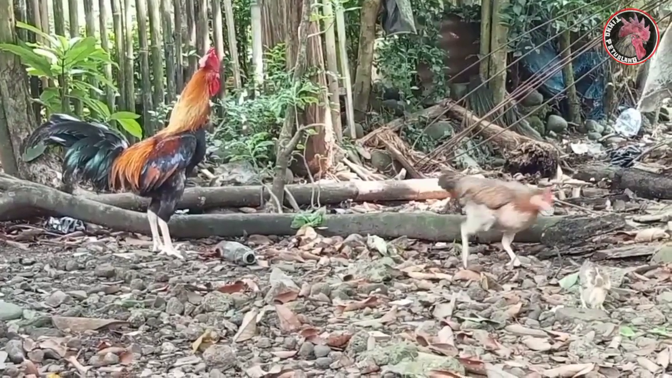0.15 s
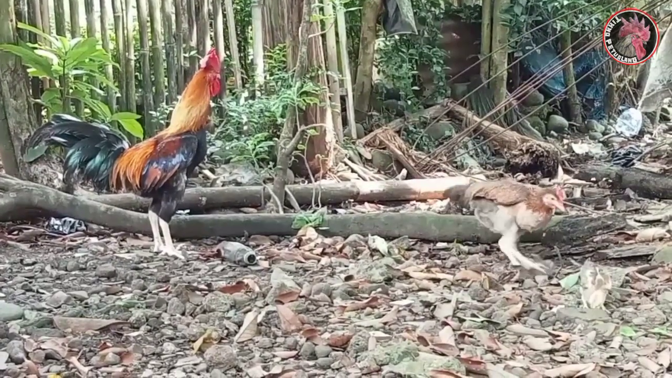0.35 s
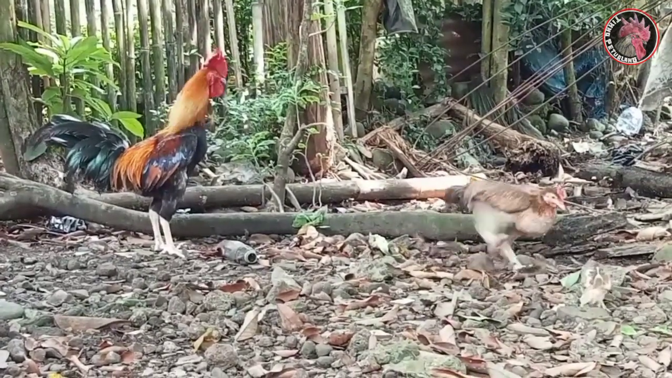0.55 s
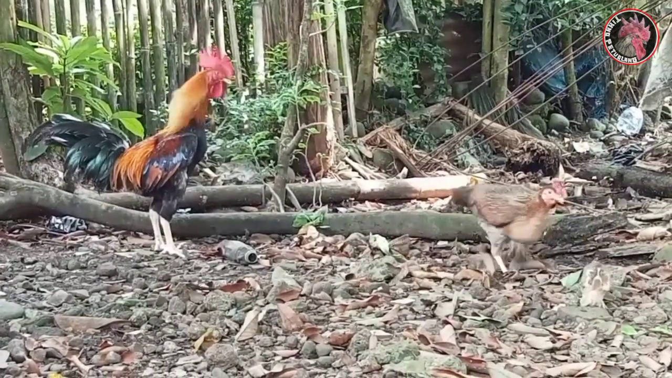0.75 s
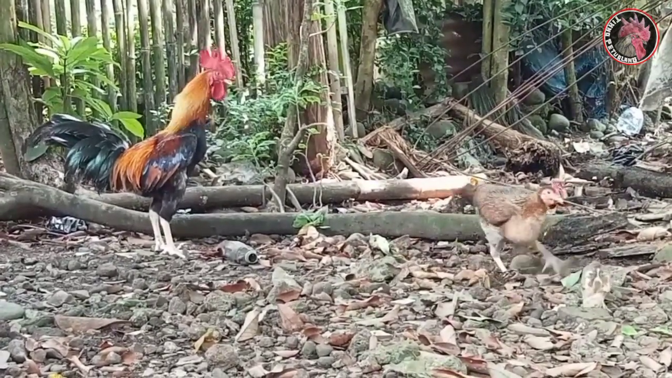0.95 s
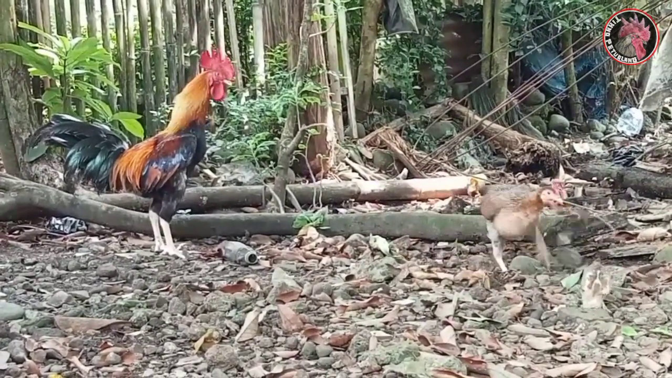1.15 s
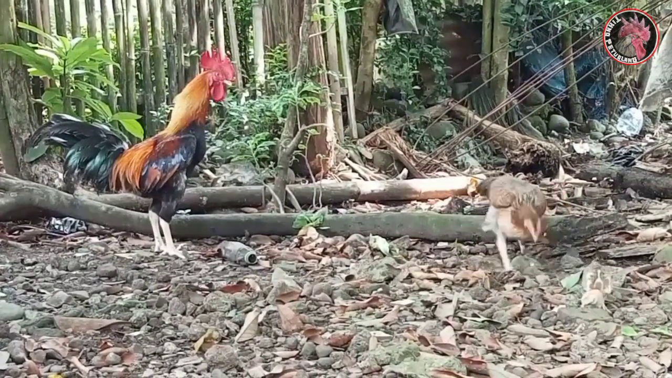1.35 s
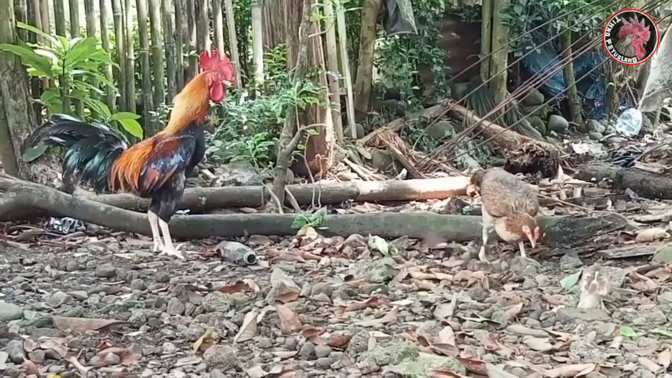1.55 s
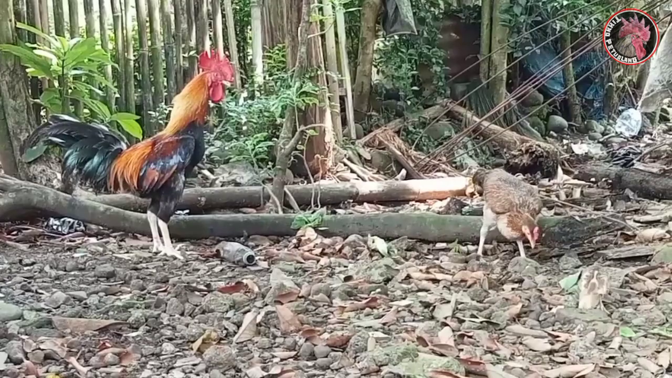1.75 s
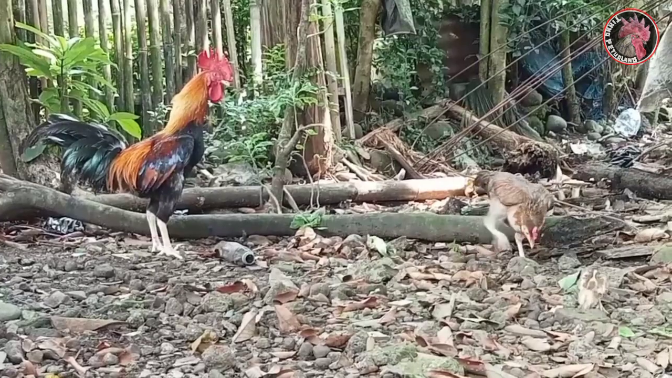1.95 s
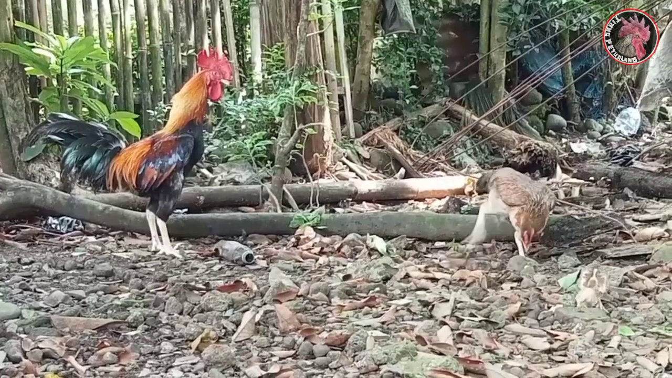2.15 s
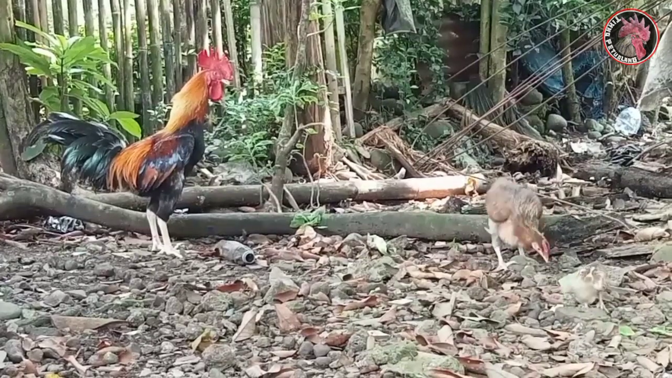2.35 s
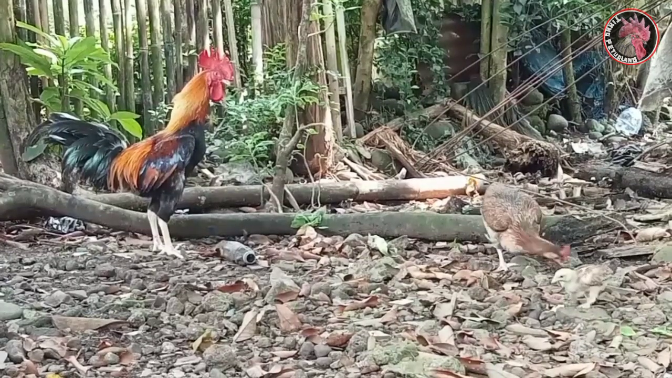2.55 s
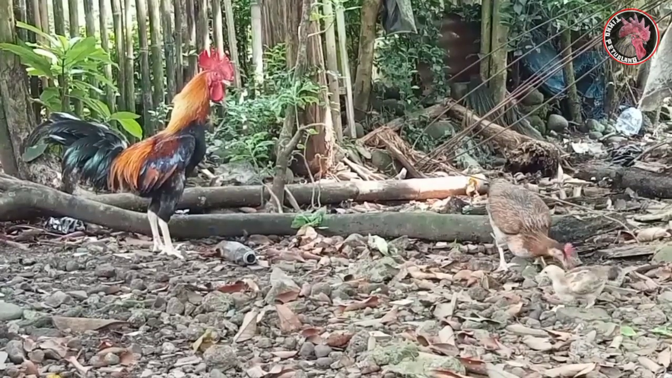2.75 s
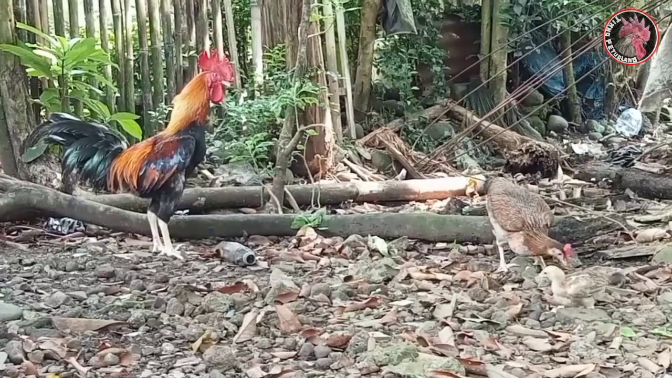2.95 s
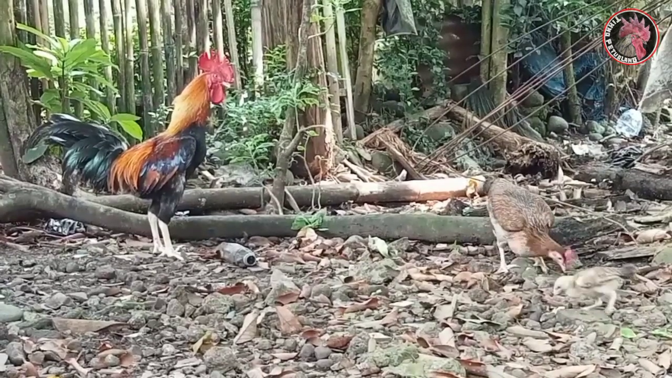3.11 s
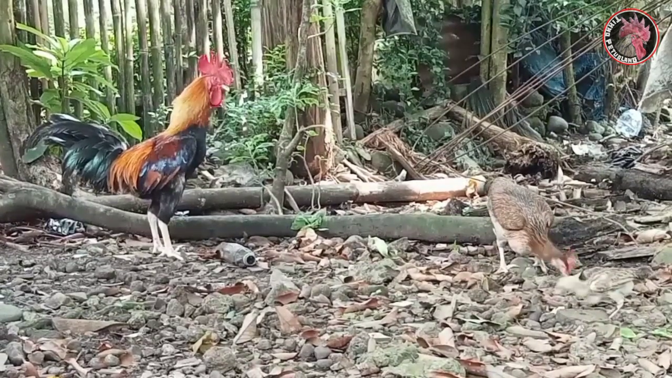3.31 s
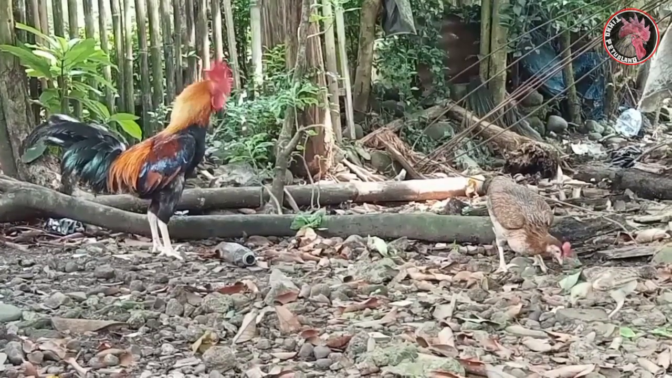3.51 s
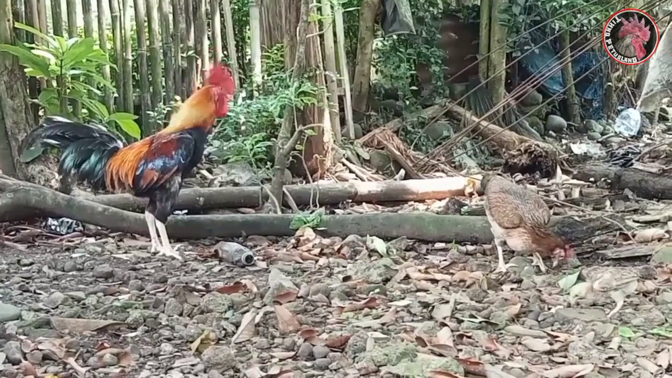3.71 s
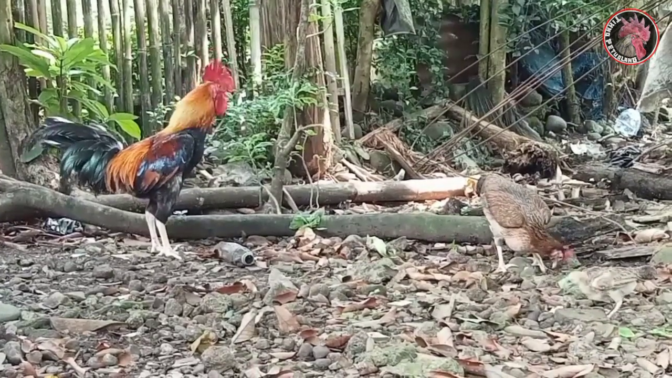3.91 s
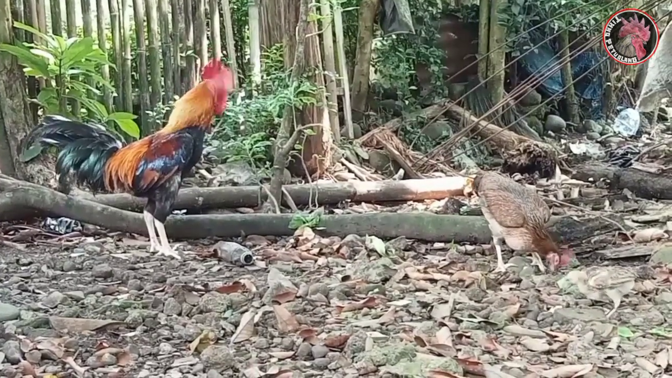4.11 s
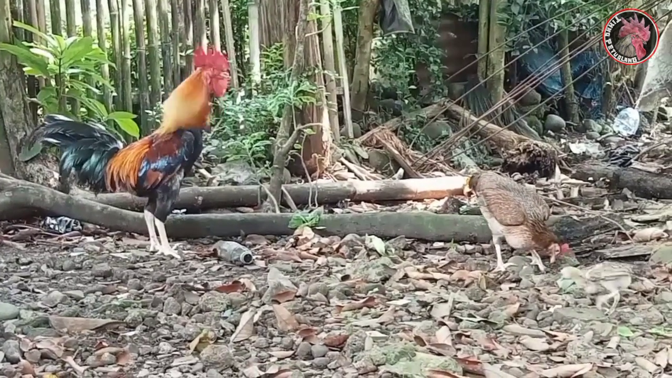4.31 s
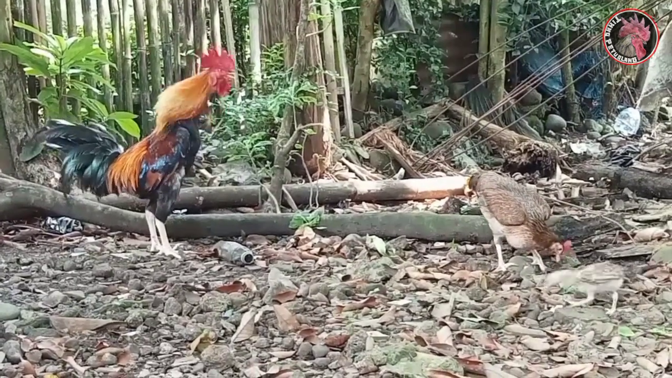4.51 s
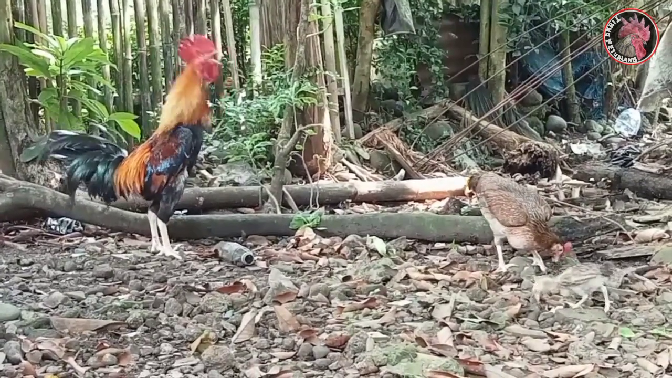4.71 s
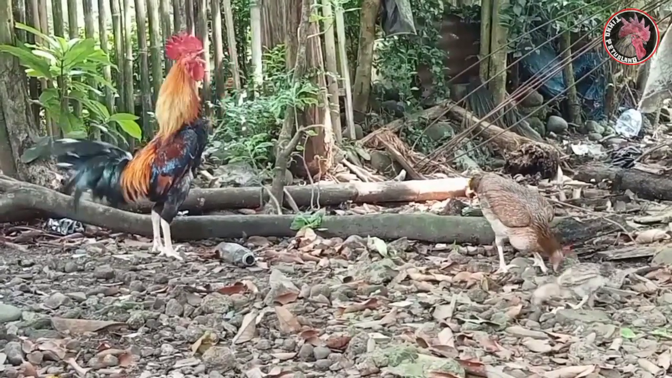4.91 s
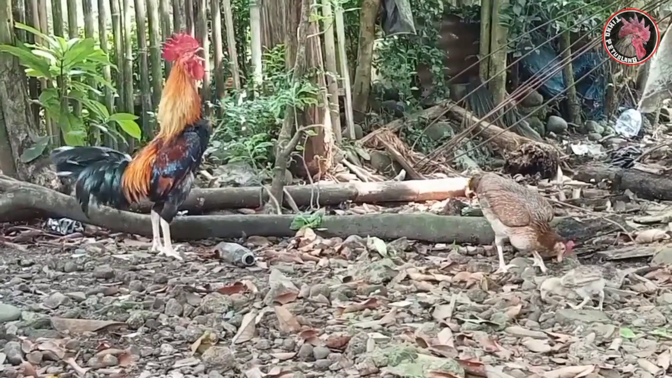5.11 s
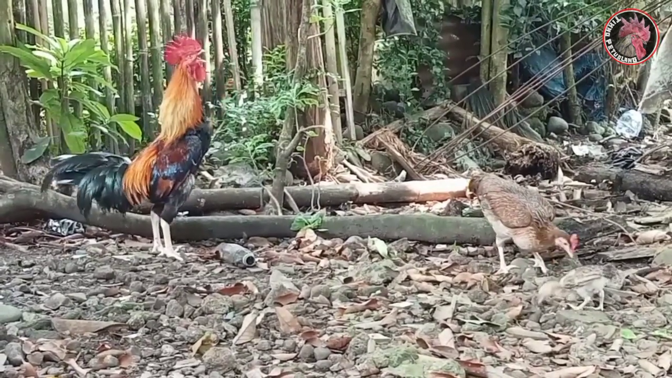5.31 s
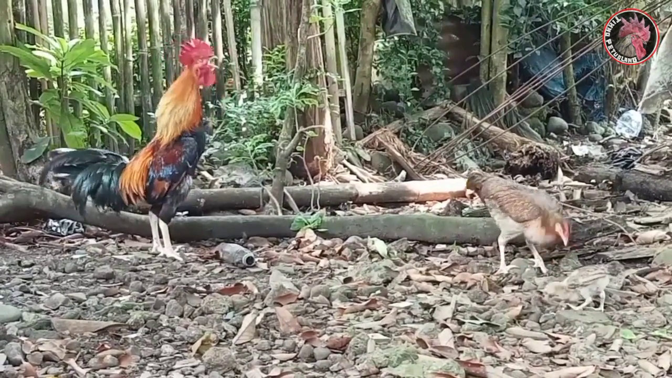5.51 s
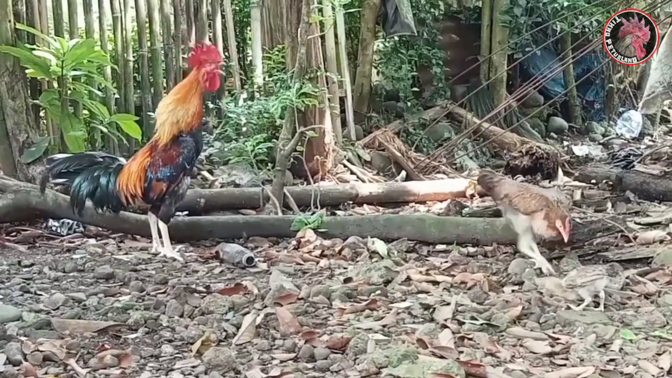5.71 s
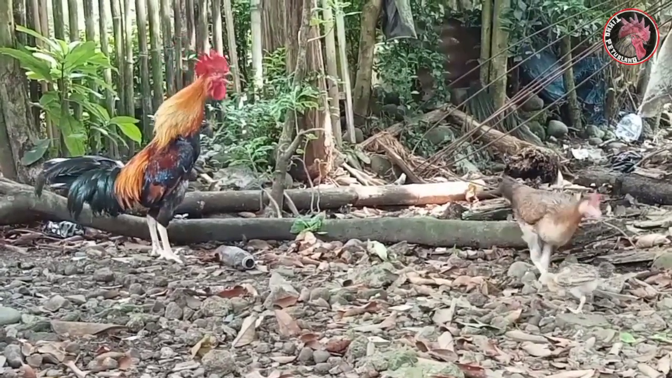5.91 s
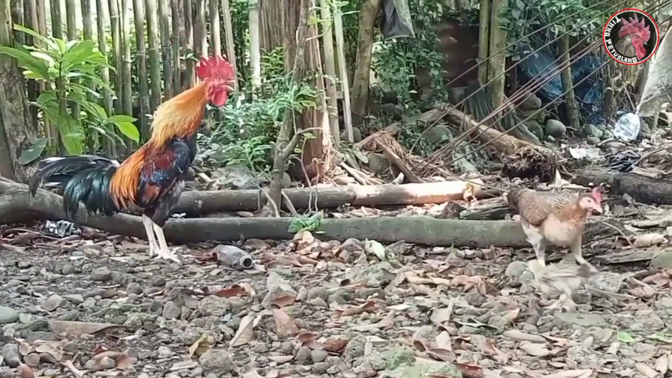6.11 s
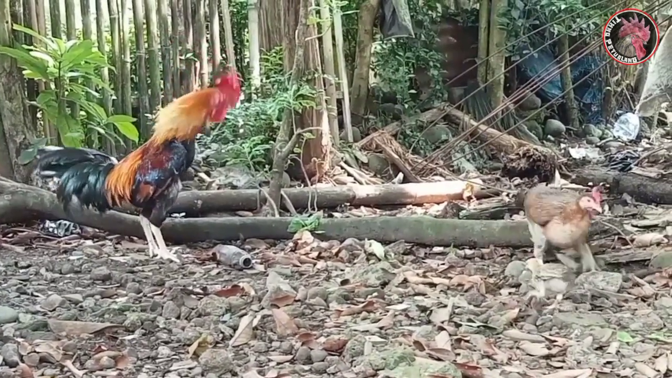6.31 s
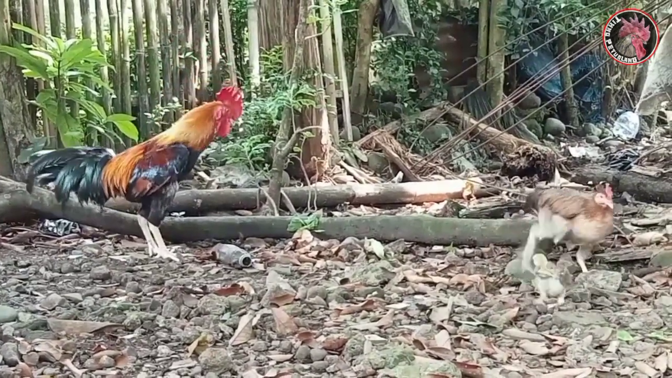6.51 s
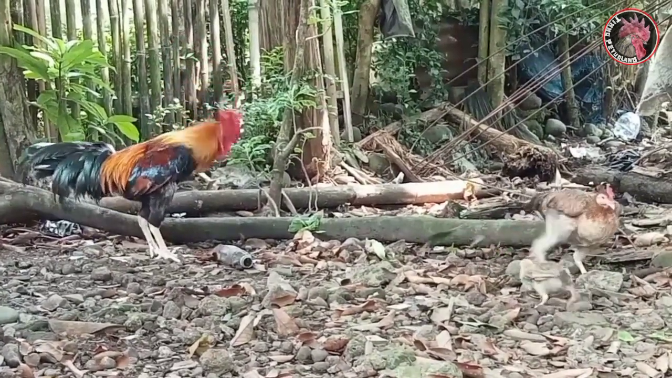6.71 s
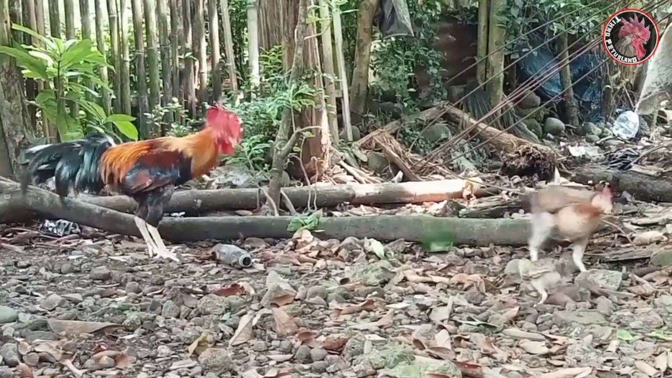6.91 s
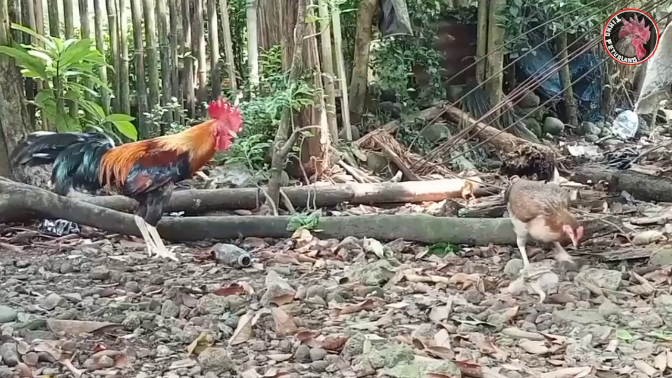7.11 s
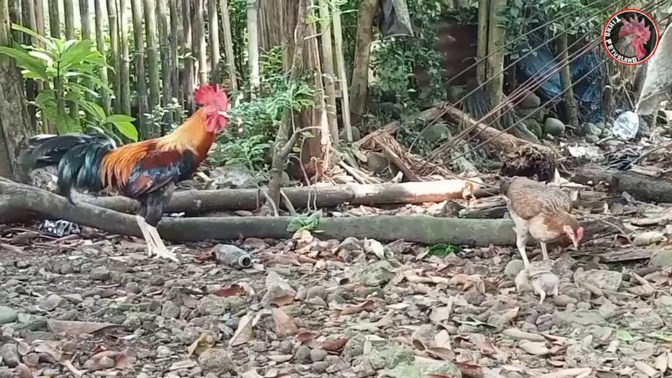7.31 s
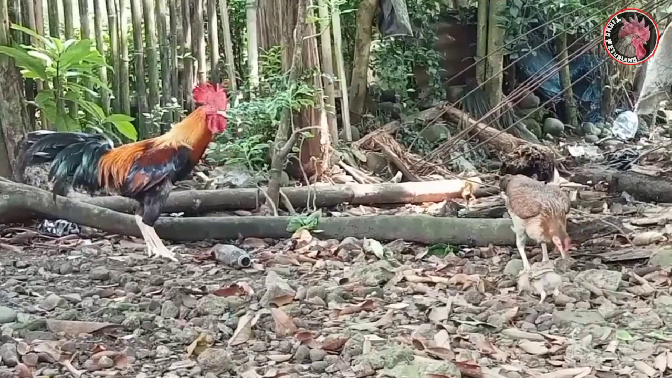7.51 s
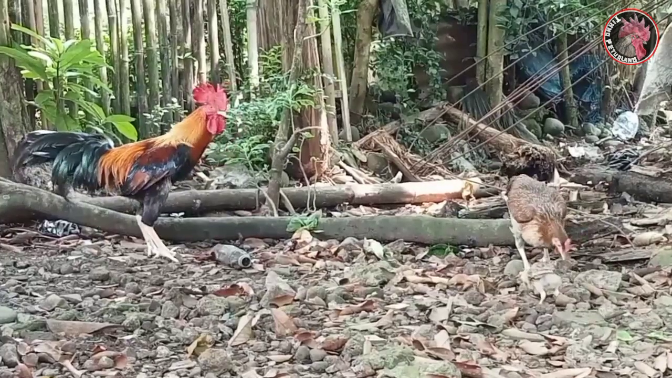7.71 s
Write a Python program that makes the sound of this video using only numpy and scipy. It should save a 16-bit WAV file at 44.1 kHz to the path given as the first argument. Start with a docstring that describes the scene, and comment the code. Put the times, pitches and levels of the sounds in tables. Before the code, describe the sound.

A quiet outdoor yard with soft air noise and a low rumble that swells at times. From 0 to about 2.3 s, feet scratch dry leaves and gravel in uneven strokes, with sharp twig snaps, especially around 0.6 to 1.7 s, and small hard clinks near 1.4 and 1.7 s. A chick peeps thinly, trilling around 1 s, and distant roosters call faintly until 4.3 s. Scratching becomes sparse; a hen moans softly from 2.6 to 3.3 s and peeps continue to 4.7 s. At 4.7 s a close rooster crows extremely loudly: a short rasp, a longer hoarse syllable from 5.0 s, then a third from 5.65 s that clears into a held note until 6.37 s. The microphone flattens its peaks, and a short yard echo follows. A soft low groan lasts from 6.4 to 7 s while scratching, snaps and a few peeps resume, fading by about 7.6 s.

```python
"""Rooster crowing in a back yard

A rooster crows close by: three rasping syllables, the last settling on a clean held note, then a soft groan.
Its voice is built from harmonics, with rough noise where the voice box turns chaotic.
Feet scratch leaves and gravel (tiny noise grains, snaps, ringing clinks), a chick peeps and a hen moans
(gliding tones), and other roosters call far away. The yard echoes over air noise and a low rumble.
The crow overloads the microphone, which flattens its peaks."""
import sys
import numpy as np
from scipy import signal
from scipy.fft import rfft, irfft, next_fast_len
from scipy.io import wavfile

SR = 44100
rng = np.random.default_rng(int(sys.argv[2]) if len(sys.argv) > 2 else 0)


def store_wav(level_fs):
    """Save 16-bit WAV to argv[1]."""
    pcm = np.round(np.clip(np.atleast_2d(level_fs), -1, 1) * 32767)
    wavfile.write(sys.argv[1], SR, pcm.T.astype(np.int16))


N = 341775
TIME = np.arange(N) / SR   # seconds


def from_db(db):
    """Turn decibels into gain."""
    return 10 ** (np.asarray(db) / 20)


def unit_power(x):
    """Scale a sound to an average power of 1."""
    return x / np.sqrt(np.mean(x ** 2) + 1e-20)


def in_time(rows):
    """Draw each column of a table as a curve over time; the first column is the time."""
    s, *columns = np.transpose(rows)
    return [np.interp(TIME, s, column) for column in columns]


def during(rows, fade_s=0.0068):
    """Give 1 from the first row's time to the last row's, with soft ends, and 0 elsewhere."""
    from_nearest_end = np.minimum(TIME - rows[0][0], rows[-1][0] - TIME)
    return np.clip(from_nearest_end / fade_s, 0, 1)


def arch(start, length):
    """Swell and fade once, as half a sine wave."""
    return np.sin(np.pi * np.clip((TIME - start) / length, 0, 1))


def drift(rate_hz):
    """Wander smoothly at random around zero, with a spread of 1; white noise loses its fast changes."""
    r = np.exp(-2 * np.pi * rate_hz / SR)
    noise = rng.standard_normal(N + SR // 2)
    # the extra half second lets the filter get going
    return unit_power(signal.lfilter([1], [1, -2 * r, r * r], noise)[-N:])


def colour(x, spectrum):
    """Shape a sound by a (pitch_hz, level_db) table, falling 20 dB an octave beyond its ends; unit power."""
    size = next_fast_len(N)
    octave = np.log2(np.maximum(np.arange(size // 2 + 1) * SR / size, 1))
    hz, db = np.transpose(spectrum)
    beyond = np.abs(octave - np.clip(octave, np.log2(hz[0]), np.log2(hz[-1])))
    gain = from_db(np.interp(octave, np.log2(hz), db) - 20 * beyond)
    return unit_power(irfft(rfft(x, size) * gain, size)[:N])


def band(x, low_hz, high_hz):
    """Keep only the pitches between two limits."""
    limits = [low_hz, min(high_hz, .45 * SR)]
    return signal.sosfilt(signal.butter(2, limits, "band", fs=SR, output="sos"), x + 1e-18)


def turn(hz):
    """Add up a pitch curve into the angle of a vibration."""
    return 2 * np.pi * np.cumsum(hz) / SR


def stack(phase, overtones, gate):
    """Add sine waves at multiples of one vibration, heard where the gate is open."""
    out, on = np.zeros(N), gate > 0
    out[on] = sum(from_db(db) * np.sin(multiple * phase[on]) for multiple, db in overtones)
    return out * gate


def add(out, s, sound):
    """Mix a short sound in at a given second."""
    start = max(round(s * SR), 0)
    out[start:start + len(sound)] += sound[:N - start]


def resonance(hz, width_hz):
    """Make noise ring around a centre pitch that may move: two random swings at right angles."""
    phase = turn(hz)
    return drift(width_hz) * np.cos(phase) + drift(width_hz) * np.sin(phase)


def soft_call(rows, overtones, jitter):
    """Sound a quiet voice whose pitch and level follow a table and waver slightly."""
    hz, db = in_time(rows)
    phase = turn(hz * (1 + jitter * drift(130)))
    return from_db(db + 2 * drift(36)) * stack(phase, overtones, during(rows))


# tone colour of the air: pitch_hz, level_db
AIR_COLOUR = [(15, -47.5), (25, -22), (96, -8), (178, -3), (289, -11.5), (551, -7), (598, -11.5),
              (996, -13.5), (1110, -12), (1340, -18.5), (3930, -19.5), (7910, -29), (9290, -19),
              (11500, -34), (15500, -31.5)]
# tone colour of the rumble: pitch_hz, level_db
RUMBLE_COLOUR = [(25, -30.5), (55, -12), (85, 0.5), (130, -10), (220, -18.5), (400, -45)]
# swells of the rumble: start_s, length_s, level_db
RUMBLE_SWELLS = [(1.55, 0.33, -56), (3.36, 0.16, -57), (6.3, 1.45, -60)]


def outdoors(air_db=-59.5, rumble_db=-60):
    """Coloured noise for the air, over a low rumble that swells now and then."""
    rumble_level = from_db(rumble_db) + sum(from_db(db) * arch(s, length) for s, length, db in RUMBLE_SWELLS)
    air = from_db(air_db) * colour(rng.standard_normal(N), AIR_COLOUR)
    return air + rumble_level * colour(rng.standard_normal(N), RUMBLE_COLOUR)


def stroke(start, length, hump_db=5.0, rise_share=0.33, settle_db_per_s=221):
    """A foot digs in over a share of the stroke, presses hardest midway, and the leaves settle after it."""
    age = TIME - start
    settle_db = np.clip(settle_db_per_s * (age - length), 0, 100)
    rise = np.clip(age / (rise_share * length), 0, 1)
    return rise * from_db(hump_db * (arch(start, length) - 1.55) - settle_db)


# strokes of the feet, levels before the overall gains: start_s, length_s, crackle_db, scuff_db
SCRATCH_STROKES = [(0.0, 0.0082, -42.5, -49), (0.017, 0.3, -53.5, -60), (0.324, 0.22, -53.5, -78),
                   (0.452, 0.22, -37.5, -48), (0.654, 0.16, -52, -49.5), (0.764, 0.18, -42, -57.5),
                   (0.847, 0.21, -45, -51), (1.05, 0.11, -32.5, -45), (1.098, 0.18, -39.5, -52.5),
                   (1.21, 0.54, -41, -48), (1.298, 0.022, -36, -39), (1.494, 0.13, -37, -53),
                   (1.691, 0.011, -39.5, -40), (1.733, 0.3, -58.5, -53.5), (2.142, 0.12, -42, -54.5),
                   (2.269, .03, -49, -59), (2.818, 0.028, -42.5, -65), (2.977, 0.024, -52.5, -61),
                   (3.02, 0.31, -61, -58), (3.329, 0.17, -60, -47.5), (6.352, 0.26, -46.5, -48),
                   (6.619, 0.11, -41.5, -58.5), (6.762, 0.14, -39, -52), (6.876, 0.093, -39, -48),
                   (7.006, 0.12, -37.5, -45), (7.129, 0.21, -45, -51.5), (7.375, 0.045, -43.5, -49),
                   (7.42, 0.1, -57.5, -62.5), (7.577, 0.1, -59, -57)]
# tone colour of crackling leaves: pitch_hz, level_db
LEAF_COLOUR = [(710, -13), (1200, -28), (1500, -10), (1650, -19), (2410, -14.5), (2770, -10.5), (4430, -4),
               (5140, -6), (7020, -4.5), (8330, -6), (9470, 4.5), (10300, -3.5), (11600, -13.5),
               (15500, -11.5)]
# tone colour of scuffed soil: pitch_hz, level_db
SOIL_COLOUR = [(76, -15.5), (130, 3.5), (610, -2), (772, -2), (907, -4.5), (1010, -2), (2500, -11.5),
               (3250, -14), (5500, -120)]


def scratching(grains_per_s=3000, crumb_share=0.41, crackle_db=1.5, scuff_db=-2.5):
    """Dry leaves crumple in clumps of tiny cracks while the feet scuff the soil beneath."""
    crackle, scuff = sum(from_db(levels_db)[:, None] * stroke(s, length)
                         for s, length, *levels_db in SCRATCH_STROKES)
    # the chance of a crack wanders, so cracks come in clumps
    born = rng.random(N) < grains_per_s * from_db(4.5 * drift(50)) / SR
    grains = born * rng.choice([-1, 1], N)
    crumbs = grains * (rng.random(N) < crumb_share)
    leaves = from_db(crackle_db) * crackle * colour(grains, LEAF_COLOUR)
    soil = from_db(scuff_db) * scuff * colour(crumbs, SOIL_COLOUR)
    return leaves + soil


# far roosters, one list a call, levels before the overall gain: time_s, pitch_hz, level_db
FAR_CROWS = [
    [(0, 623, -63), (.3, 622, -65), (.6, 607, -55.5), (.85, 580, -76)],
    [(1.78, 595, -62), (1.97, 622, -60), (2.15, 642, -70), (2.4, 604, -64), (2.6, 617, -74)],
    [(2.68, 525, -73), (2.8, 555, -65), (2.92, 479, -73), (3.1, 478, -59.5), (3.24, 505, -58),
     (3.32, 504, -78)],
    [(3.7, 673, -74), (3.85, 658, -56.5), (4.05, 621, -61), (4.28, 615, -72)],
]
# their overtones: multiple of the pitch, level_db
FAR_OVERTONES = [(1, -12), (2, -15), (3, 0), (4, -6)]


def far_roosters():
    """Distant crows, each a few overtones gliding on one pitch curve."""
    return from_db(-4.0) * sum(soft_call(rows, FAR_OVERTONES, jitter=0.015) for rows in FAR_CROWS)


# twigs and leaves snapping, levels before the overall gains: start_s, crack_db, crack_hz, knock_db, knock_hz
SNAPS = [(0.0827, -23.5, 8700, -58, 5520), (0.5312, -24, 9300, -19, 4440), (0.5926, -8, 9600, -18, 4250),
         (0.6848, -22, 9400, -26.5, 3350), (0.7896, -18.5, 9300, -31, 3660), (0.9168, -15, 9500, -27, 800),
         (0.9214, -4.5, 9650, -42, 2660), (1.0684, -33, 9600, -32, 2560), (1.0974, -7.5, 9300, -22, 5800),
         (1.271, -22, 9300, -13, 3450), (1.311, -34, 9400, -11, 786), (1.5644, -22, 9300, -34, 4340),
         (1.6916, -14, 9000, -12, 5100), (1.8552, -31, 9250, -27, 4330), (2.2373, -18.5, 9200, -25, 6000),
         (2.281, -25, 9200, -45, 5130), (2.825, -22, 11100, -43, 1070), (6.6787, -28, 14000, -32, 3430),
         (6.8044, -21, 9320, -36, 5700), (6.9299, -3.5, 9800, -45, 6040), (7.2549, -38, 9300, -18, 3830),
         (7.4016, -26, 9900, -29.5, 3114)]


def snaps(crack_s=0.00054, splinter_s=0.014, splinter_db=-13, crack_gain_db=-1.5, knock_gain_db=-3.5):
    """A sharp crack, a short spray of splinters, and the knock of the twig itself, all from one noise burst."""
    out, t = np.zeros(N), TIME[:SR // 10]
    for s, crack_db, crack_hz, knock_db, knock_hz in SNAPS:
        fading = np.exp(-t / crack_s) + from_db(splinter_db) * np.exp(-t / splinter_s)
        burst = rng.standard_normal(len(t)) * fading
        crack = from_db(crack_db + crack_gain_db) * band(burst, crack_hz / 1.22, crack_hz * 1.145)
        knock = from_db(knock_db + knock_gain_db) * band(burst, knock_hz / 1.7, knock_hz * 1.43)
        add(out, s, crack + knock)
    return out


# chick peeps: start_s, low_note_db, high_note_db, octave_db (added to the shape's), pitch_ratio
PEEPS = [(0.178, -39.5, -67, -3.5, 1.07), (0.369, -70, -55, -3, 0.99), (1.249, -45, -43, -13, 1.02),
         (1.665, -48, -69, -6, .94), (2.371, -53, -66, -0.5, 1.05), (2.555, -46.5, -50, 2.5, 1.0),
         (2.878, -46.5, -55, -2, 1.02), (3.216, -47, -48, 4, 1.005), (3.536, -52, -54.5, 9.5, 1.06),
         (4.028, -51, -64, -0.5, 1.01), (4.231, -45, -56.5, 2, 1.03), (4.579, -43.5, -59.5, -1, .99),
         (6.399, -63, -49.5, 11, .96), (6.751, -53.5, -49, 6, 1.08), (7.0, -36, -91, -1, 1.01)]
# the flip inside every peep, pitch before the ratio: time_s from its start, pitch_hz, level_db,
# octave_db, high_note_share (0-1)
PEEP_SHAPE = [(0, 2230, -13, 4, 0.35), (.010, 2357, 1.5, -5.5, .05), (.021, 2550, 1, -5.5, 0.51),
              (.029, 3157, 0, -14.5, .45), (.036, 3980, 0, -21.5, 0.8), (.06, 4330, 2.5, -28, 1),
              (.08, 4430, -4, -17, 1), (.1, 4180, -23, -21, 0.98)]
# the trill, its pitch before a factor of 0.95 and its level before 2 dB of gain: time_s, pitch_hz, level_db
TRILL = [(.90, 2670, -69), (.925, 2680, -43.5), (.965, 2664, -40), (1.0, 2576, -51), (1.035, 2500, -51),
         (1.065, 2643, -32.5), (1.09, 2460, -67), (1.15, 2625, -40)]


def chick(trill_hz=42, trill_depth=0.013, crack=0.058):
    """Peeps flip up by nearly an octave and turn hoarse at the break; the trill is a fast warble."""
    out = np.zeros(N)
    s, *columns = np.transpose(PEEP_SHAPE)
    t = np.arange(0, s[-1], 1 / SR)
    hz, db, octave_db, high = [np.interp(t, s, column) for column in columns]
    # hoarsest halfway between the low and the high note
    hoarse = .3 + 4 * high * (1 - high)
    quivers = drift(350)[:len(PEEPS) * len(t)].reshape(len(PEEPS), len(t))
    for (start, low_db, high_db, own_octave_db, ratio), quiver in zip(PEEPS, quivers):
        phase = turn(hz * ratio * (1 + crack * hoarse * quiver))
        level = from_db(db + low_db + high * (high_db - low_db))
        octave = from_db(octave_db + own_octave_db) * np.sin(2 * phase)
        add(out, start, level * (np.sin(phase) + octave))
    hz, db = in_time(TRILL)
    warble = 1 + trill_depth * np.sin(2 * np.pi * trill_hz * TIME) + .06 * drift(222)
    return out + from_db(db) * stack(turn(hz * warble), [(0.95, 2)], during(TRILL))


# hard bits in the gravel: start_s, level_db, pitch_ratio
CLINKS = [(1.413, -28, .94), (1.706, -22.5, 0.99)]
# ringing tones of a bit, before the ratio: pitch_hz, level_db, time to fade by 60 dB in s
CLINK_TONES = [(2720, -21, 0.082), (6380, -2, 0.052), (9500, -3, 0.088), (10620, -1, 0.045),
               (12440, -31, 0.13), (14300, -32, 0.19)]


def clinks():
    """Small hard pieces ring when they are kicked: a few tones that start at once and fade."""
    out, t = np.zeros(N), TIME[:SR // 3]
    for s, level_db, ratio in CLINKS:
        ringing = sum(from_db(level_db + db - 60 * t / fade_s) * np.sin(2 * np.pi * hz * ratio * t)
                      for hz, db, fade_s in CLINK_TONES)
        add(out, s, ringing)
    return out


# the hen's moan: time_s, pitch_hz, level_db
MOAN = [(2.6, 256, -59), (2.7, 271, -66), (2.8, 274, -59.5), (2.92, 258.7, -62), (3.0, 275.4, -65.5),
        (3.15, 290, -72), (3.35, 294, -71)]
# its overtones: multiple of the pitch, level_db
MOAN_OVERTONES = [(1, -3), (2, -25), (3, -2.5), (4, 2), (5, -12), (6, -7.5)]


def hen_moan():
    """A hen's soft low voice, built from overtones of one pitch."""
    return soft_call(MOAN, MOAN_OVERTONES, jitter=0.012)


# the crow's syllables: start_s, end_s, attack_s, release_s, level_db, sag in dB per s
SYLLABLES = [(4.698, 4.952, 0.1, 0.1, 0, 29), (4.967, 5.652, 0.062, 0.13, -0.5, 7),
             (5.647, 6.372, .075, 0.039, -1.5, 0)]
RELEASE_DB = 26   # how far a syllable falls over its release


def by_syllable(rows):
    """Hold one row's values for each syllable until the next syllable starts."""
    which = np.searchsorted([row[0] for row in SYLLABLES[1:]], TIME)
    return np.array(rows, float).T[:, which]


def syllable_drive():
    """Each syllable swells, sags and is released; gives its strength and the seconds from its middle."""
    start, end, attack, release, level_db, sag = by_syllable(SYLLABLES)
    age = np.maximum(TIME - start, 0)
    from_middle = np.clip(TIME, start, end) - (start + end) / 2
    fall_db = RELEASE_DB * np.clip(1 - (end - TIME) / release, 0, 1)
    gate = sum(during([row[:1], row[1:2]], fade_s=0.012) for row in SYLLABLES)
    swell = np.minimum(age / attack, 1) ** .7
    return gate * swell * from_db(level_db - sag * from_middle - fall_db), from_middle


# resonances of windpipe and open beak, one list a syllable, before moving and widening:
# pitch_hz, width_hz, level_db
BEAK_RESONANCES = [
    [(4470, 13, 7.5), (4900, 63, 5.5), (5200, 300, -5), (7650, 32, 1), (7440, 360, -4.5),
     (10000, 110, -3.5), (11800, 64, -10)],
    [(3700, 110, -11.5), (4390, 10, 2.5), (5000, 100, -8), (5930, 29, 2.5), (8315, 80, -7),
     (9630, 34, -1.5), (10200, 33, -11), (9330, 45, 1), (11150, 80, -11.5)],
    [(3727, 23, -9), (4760, 16, 13.5), (5090, 106, -6), (5930, 67, -15.5), (7540, 96, -8.5), (7900, 110, 1),
     (9000, 59, -15.5), (10050, 58, -13)],
]


def beak_rasp(stretch, widen=1.5, wander=.014, flicker_db=1.0):
    """Each syllable holds neck and beak differently, and rings with its own restless high resonances."""
    out = np.zeros(N)
    for (start, end, *_), resonances in zip(SYLLABLES, BEAK_RESONANCES):
        moving = stretch * (1 + wander * drift(14))
        ringing = 0
        for hz, width, db in resonances:
            level = from_db(db + flicker_db * drift(14)) * np.sqrt(width)
            ringing = ringing + level * resonance(hz * moving, widen * width)
        out += unit_power(ringing) * during([(start,), (end,)])
    return out


# short low notes: the second side of the voice box, and last the main voice dropping as the crow ends:
# start_s, length_s, pitch_hz (at its middle), glide in Hz per s, level_db
LOW_NOTES = [(4.706, 0.034, 593.4, 1499.5, -12), (4.849, 0.04, 647, -10, -19),
             (4.964, .09, 683.5, 454.5, -13), (5.136, 0.082, 672.7, 451, -12.5),
             (5.463, .07, 656.4, -3, -12), (5.675, 0.025, 603, 499, -22), (6.336, .036, 588.4, -9000, -22)]


def low_notes(jitter=0.02):
    """Notes of the second side of the syrinx, then the main voice's drop; each swells and fades on a glide."""
    out, unsteady = np.zeros(N), 1 + jitter * drift(120)
    for s, length, hz, glide, db in LOW_NOTES:
        phase = turn((hz + glide * (TIME - s - length / 2)) * unsteady)
        gate = arch(s, length) * during([(s,), (s + length,)], fade_s=0.005)
        out += from_db(db) * stack(phase, [(1, 4.0), (2, -14.5), (3, -4.5)], gate)
    return out


# main side of the syrinx (the voice box), one curve a syllable: time_s, pitch_hz, roughness (0-1)
SYRINX = [
    [(4.697, 687, 0.88), (4.733, 705, 0.17), (4.768, 757, 0.2), (4.788, 767, 0.5), (4.82, 745, 0.47),
     (4.88, 701, 0.5)],
    [(4.97, 756, .95), (5.01, 804.8, 0.9), (5.038, 798.3, 0.3), (5.07, 845, 0.39), (5.135, 751, 0.39),
     (5.205, 765, 0.34), (5.245, 843, 0.41), (5.283, 864, 0.24), (5.305, 835, 0.64), (5.41, 816, .62),
     (5.45, 745, 0.5), (5.50, 780, 0.67), (5.60, 733, 0.87)],
    [(5.68, 727, 0.82), (5.72, 752, 0.08), (5.745, 822, 0.45), (5.87, 805, 0.67), (5.925, 753, 0.3),
     (5.995, 757, 0.41), (6.035, 739, .09), (6.105, 724, 0), (6.15, 702, 0.01), (6.24, 727, .01),
     (6.325, 714, 0.05), (6.36, 663, 0.01)],
]
# level of the main line before choking and gain, one curve a syllable: time_s, level_db
MAIN_LINE = [
    [(4.7, -15), (4.742, -5.5), (4.77, -4), (4.792, -15), (4.816, -1), (4.854, -16.5), (4.886, -27),
     (4.898, -25), (4.95, -31.5)],
    [(4.97, -9.5), (5.044, -4), (5.154, -14.5), (5.282, -2.5), (5.302, -11.5), (5.402, -6), (5.482, -12),
     (5.55, -7), (5.63, -33)],
    [(5.66, -28.5), (5.708, -5.5), (5.902, -10), (5.918, -1.5), (6.13, -13.5), (6.156, -16.5),
     (6.246, -6.5), (6.31, -10.5), (6.38, -31)],
]
# base levels in each syllable: fundamental_db, half_line_db, upper_resonance_db, overtones_db,
# beak_rasp_db, upper_resonance_hz (at the syllable's middle)
VOWELS = [(-23, -19, -23.5, -17, -18, 2760), (-20.5, -26.5, -20, -23, -20, 3020),
          (-29, -19, -26, -23, -24, 2880)]
# overtones, used here from the fifth up, before gain: multiple of the pitch, level_db
OVERTONES = [(1, -19), (2, 0), (3, -36), (4, -34), (5, -40), (6, -39), (7, -23), (8, -39), (9, -27.5),
             (10, -33), (11, -42.5), (12, -23), (13, -26.5), (14, -35), (15, -43), (16, -42.5), (17, -49),
             (18, -44), (19, -43.5), (20, -48)]
# the throat's colour on the rasp: pitch_hz, level_db
THROAT_COLOUR = [(280, -55.5), (440, -20.5), (540, -18), (690, -3), (850, -6.5), (990, -10), (1150, -3),
                 (1330, -8.5), (1650, 4), (1830, -6.5), (2000, 3.5), (2200, -17), (2500, -16),
                 (3600, -34.5)]


def crow(jitter=.02, flutter=0.6, doubling=0.21, rasp_db=-8.5, beak_db=-3.0, hiss_db=-9.5, main_db=1.0,
         third_db=-26.0, choke_db=7.0, upper_db=6.0, bright_db=12.5, swell_db=4.0, scatter=0.27,
         flank_hz=780, flank_db_per_hz=0.0523, sink_per_s=.11):
    """Two membranes beat in the syrinx; driven hard they skip cycles and turn chaotic, then settle on one note."""
    pitch, rough = in_time(np.vstack(SYRINX))
    rough = np.clip(rough, .005, 1)
    drive, from_middle = syllable_drive()
    *vowel_db, upper_hz = by_syllable(VOWELS)
    low, half, upper, bright, beak = drive * from_db(vowel_db)
    # the resonances sink as the neck stretches
    stretch = 1 - sink_per_s * from_middle
    upper_hz = upper_hz * stretch
    # roughness drains the main line
    main = from_db(in_time(np.vstack(MAIN_LINE))[0] - choke_db * rough)
    # the fundamental grows as it climbs toward a low throat resonance, and outlasts the other lines
    low = low * (drive + 1e-4) ** -.35 * from_db(flank_db_per_hz * np.maximum(pitch - flank_hz, 0))
    upper = upper * 1.15 * rough ** 0.33
    beak = beak * rough ** .12
    gate = np.minimum(drive * from_db(RELEASE_DB + 7), 1)
    phase = turn(pitch * (1 + jitter * rough * drift(170) + 0.0014 * drift(60)))
    # alternate cycles grow strong and weak, which puts lines halfway between the harmonics
    alternation = doubling * (1 + .5 * drift(56)) * np.cos(phase / 2)
    beat = 1 + rough * (alternation + flutter * drift(110))
    voiced = np.sqrt(2 - 1.4 * rough ** 2)   # roughness weakens the clear tone

    # the fundamental is set a hair flat of the pitch curve
    tone = low * from_db(4 * drift(19)) * stack(phase, [(0.99, 0)], gate)
    tone += main * stack(phase, [(2, main_db), (3, third_db)], gate)
    tone += half * np.tanh(4 * rough) ** 2.2 * np.sin(phase + phase / 2)
    # the fourth harmonic is strong only while it lies in the upper resonance
    nearness = 1 / (1 + ((4 * pitch - upper_hz) / 100) ** 2)
    tone += upper * np.tanh(6 * rough + 0.3) * stack(phase, [(4, upper_db)], gate) * nearness
    # uneven closures smear the high overtones, which swell and fade one by one as the head moves
    closure = phase + scatter * rough * drift(300)
    overtones = sum(stack(closure, [row], gate) * from_db(swell_db * drift(11.0)) for row in OVERTONES[4:])
    tone += bright * from_db(bright_db) * (1 - rough) ** 0.43 * overtones

    # turbulent air leaves in one puff a cycle
    puffs = rng.standard_normal(N) * (1 + np.cos(phase)) ** 2
    chaos = from_db(rasp_db) * drive * rough ** 0.73 * colour(puffs, THROAT_COLOUR)
    chaos += from_db(-1.5) * upper * resonance(upper_hz, 190)
    chaos += beak * from_db(beak_db) * beak_rasp(stretch) * (1 + .5 * np.cos(phase))
    breath = unit_power(band(puffs + 2 * rng.standard_normal(N), 5500, 11800))
    hiss = beak * from_db(hiss_db) * np.sqrt(rough) * breath
    return tone * voiced * beat + chaos * np.tanh(3 * rough) + hiss + low_notes()


# the groan after the crow: time_s, pitch_hz, level_db
GROAN = [(6.41, 253, -49), (6.45, 272.6, -53.5), (6.60, 269, -56), (6.72, 265, -50), (6.77, 285, -67),
         (6.81, 311.6, -52.5), (6.86, 343, -59), (6.9, 338, -70), (7.0, 298, -60)]
# its overtones: multiple of the pitch, level_db
GROAN_OVERTONES = [(1, 3.5), (2, 5.5), (3, -8.5), (4, -11), (5, -16)]


def groan():
    """The rooster's soft low voice after the crow, built from overtones of one pitch."""
    return soft_call(GROAN, GROAN_OVERTONES, jitter=0.01123)


# how long the yard rings: pitch_hz, time to fade by 60 dB in s
YARD_FADE = [(200, 0.18), (1500, 0.37), (5000, 0.33), (14000, 0.33)]


def yard(x, wet_db, first_s=0.0027):
    """Fence slats, trunks and leaves scatter sound into a noisy tail; its lowest band dies soonest."""
    t, edges = TIME[:SR], np.geomspace(150, 16000, 8)
    hz, fade_s = np.transpose(YARD_FADE)
    tail = np.zeros(SR)
    for low, high in zip(edges, edges[1:]):
        band_fade_s = np.interp(np.sqrt(low * high), hz, fade_s)
        tail += band(rng.standard_normal(SR), low, high) * from_db(-60 * t / band_fade_s)
    # the tail fades in around first_s
    tail *= np.clip(t / first_s - .5, 0, 1)
    return from_db(wet_db) * signal.fftconvolve(x, tail / np.sqrt(np.sum(tail ** 2)))[:N]


def scene():
    """Mix the birds and their feet, in the yard."""
    rooster = crow() + groan()
    feet = scratching() + snaps() + clinks()
    flock = from_db(-0.5) * (chick() + hen_moan())
    far = far_roosters()
    # the farther the source, the more of it arrives as echo
    echo = yard(rooster, wet_db=-8.5) + yard(feet, wet_db=-10.0) + yard(flock + far, wet_db=-5.5)
    return np.array([rooster + feet + flock + far + echo + outdoors()])


def record(dry, ceiling=1.0, cutoff_hz=15550):
    """The microphone flattens the loudest peaks, and the highest treble is cut."""
    clipped = dry / (1 + (dry / ceiling) ** 12) ** (1 / 12)
    return signal.sosfilt(signal.ellip(10, .1, 70, cutoff_hz, fs=SR, output="sos"), clipped)


dry = scene()
out = record(dry)
store_wav(out)
```